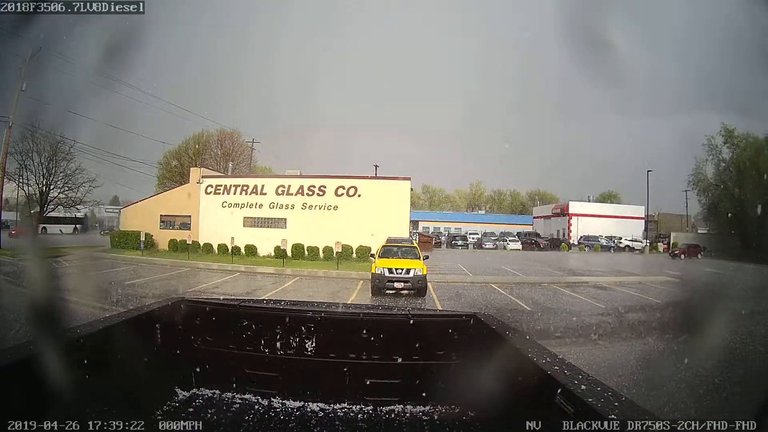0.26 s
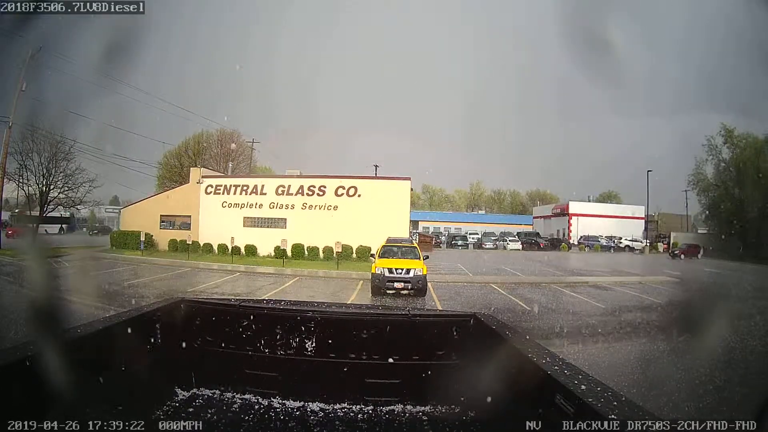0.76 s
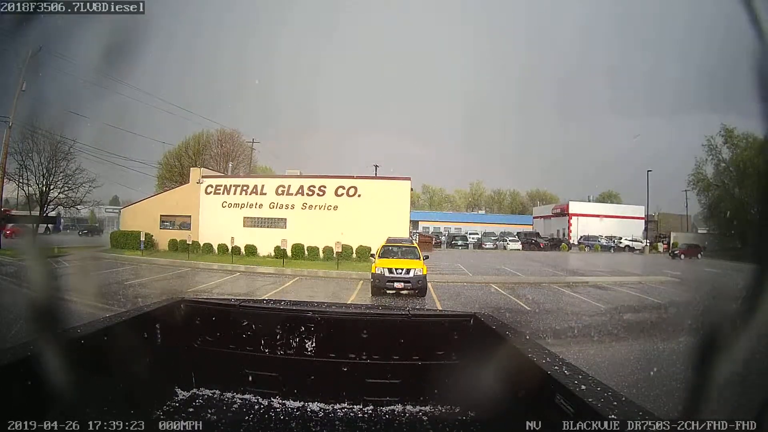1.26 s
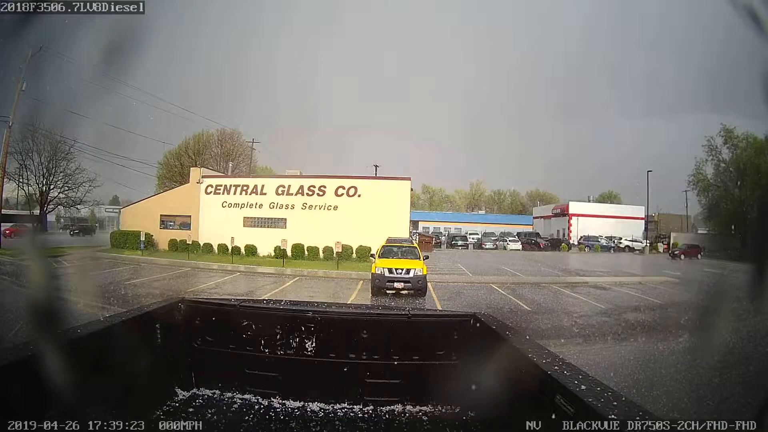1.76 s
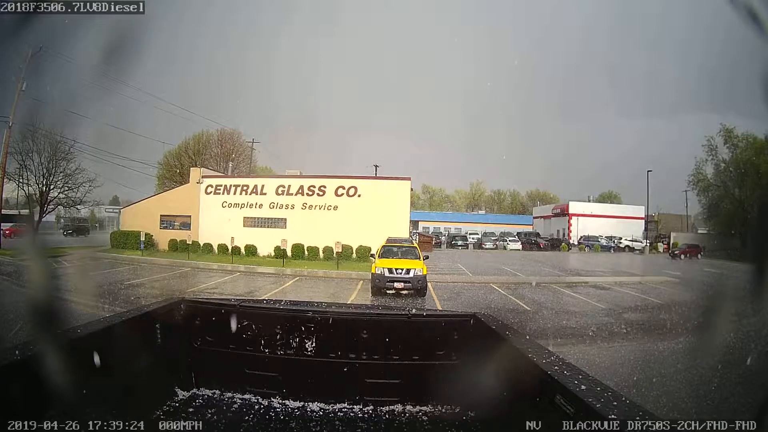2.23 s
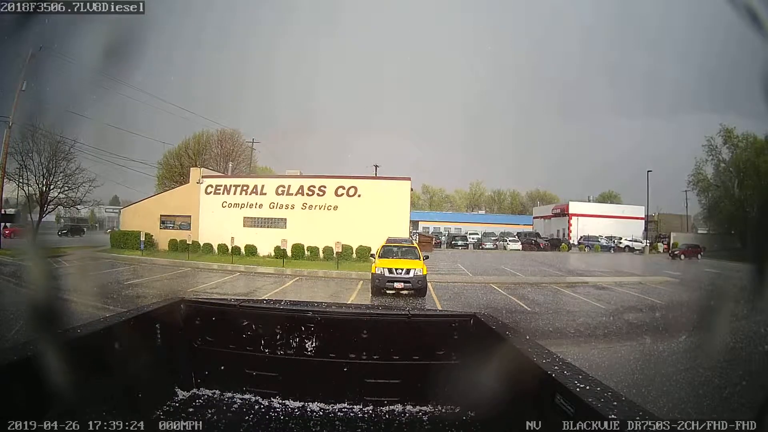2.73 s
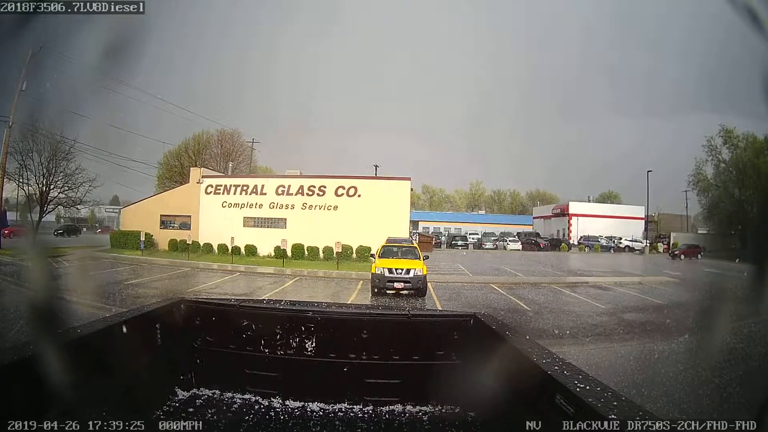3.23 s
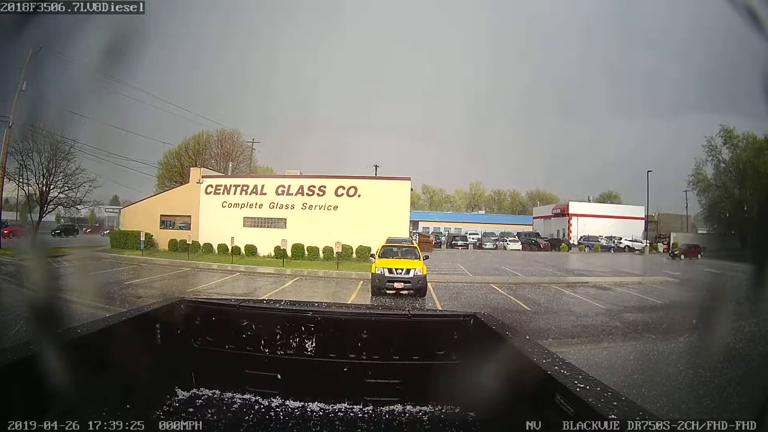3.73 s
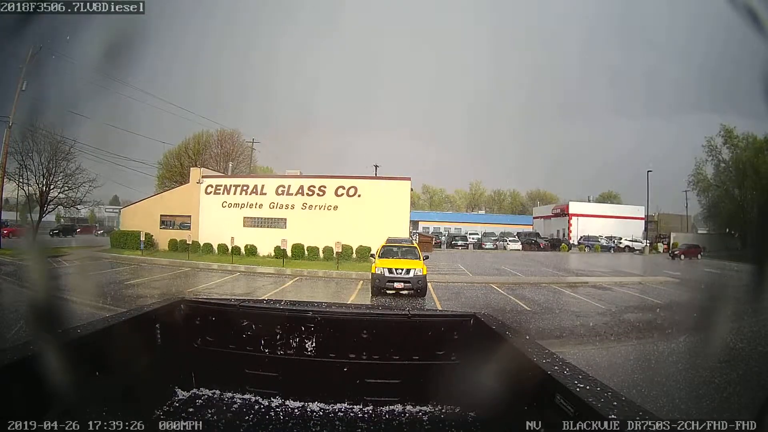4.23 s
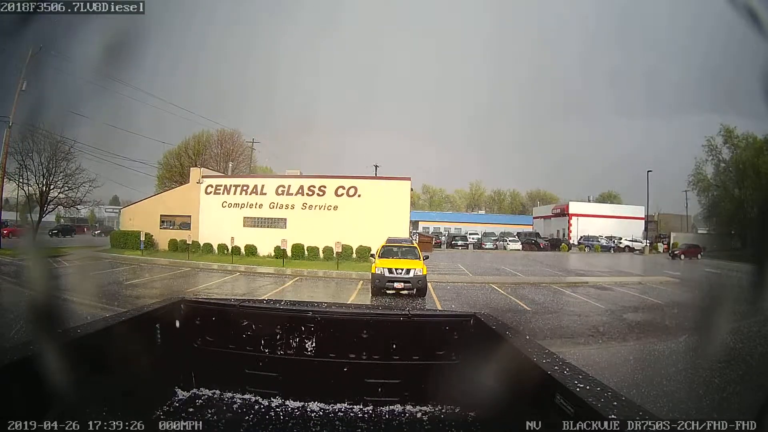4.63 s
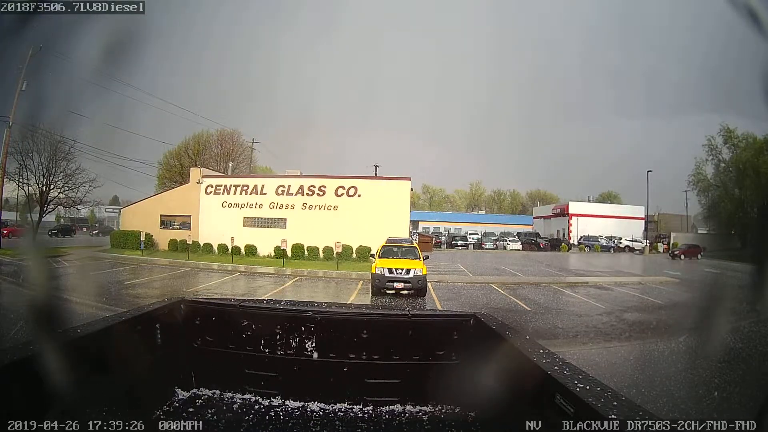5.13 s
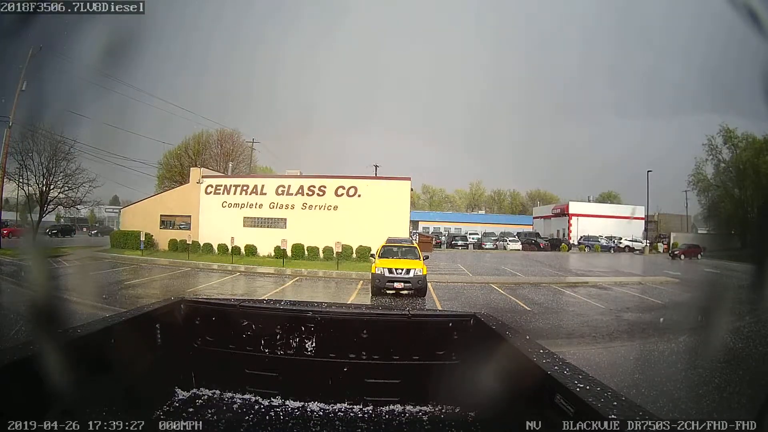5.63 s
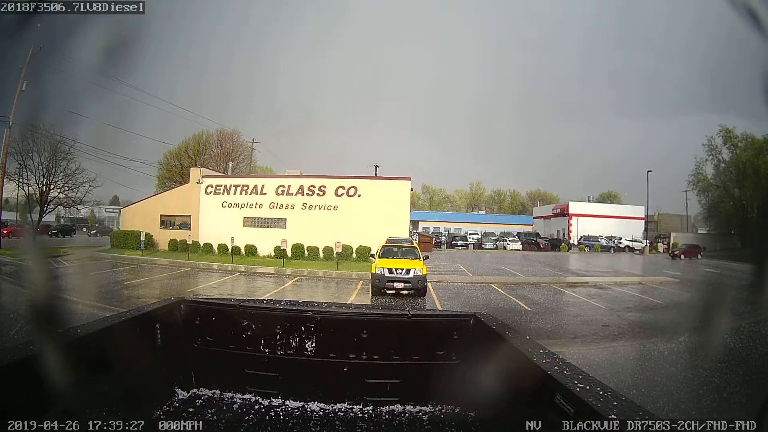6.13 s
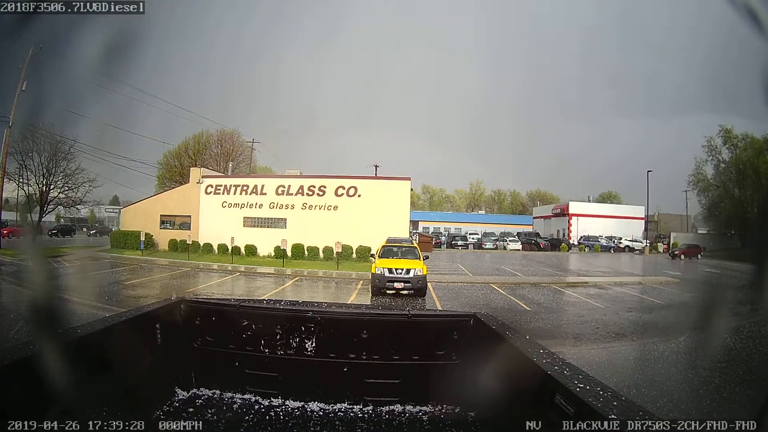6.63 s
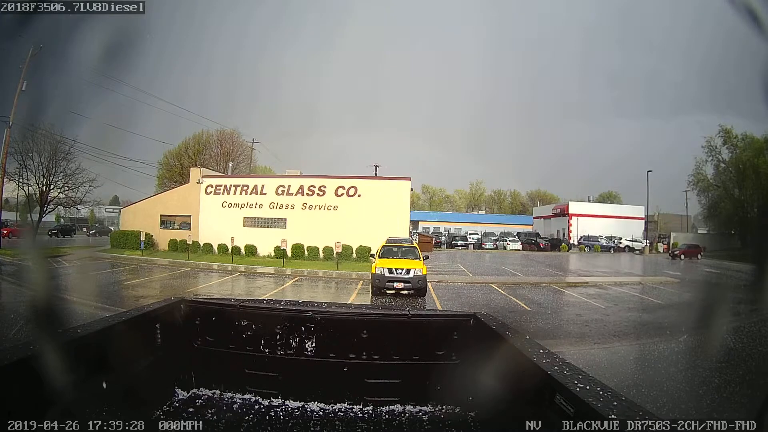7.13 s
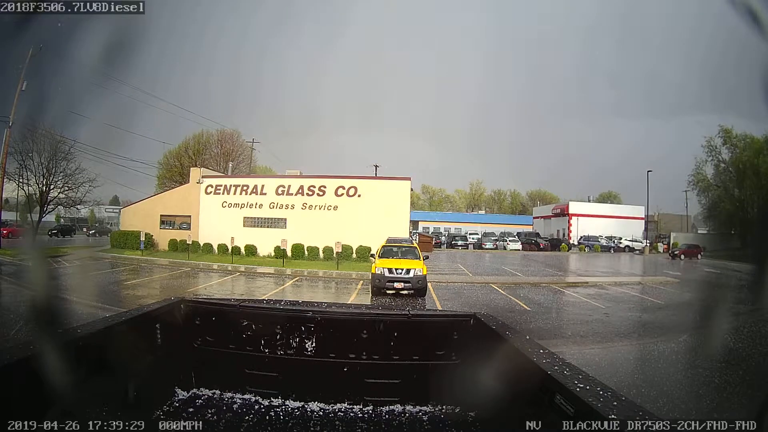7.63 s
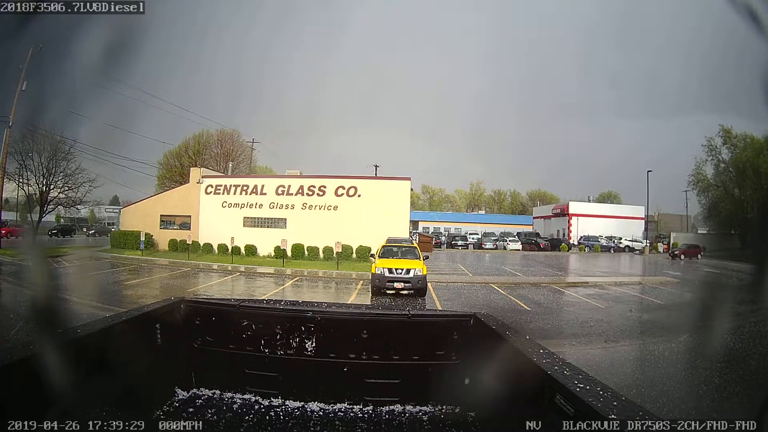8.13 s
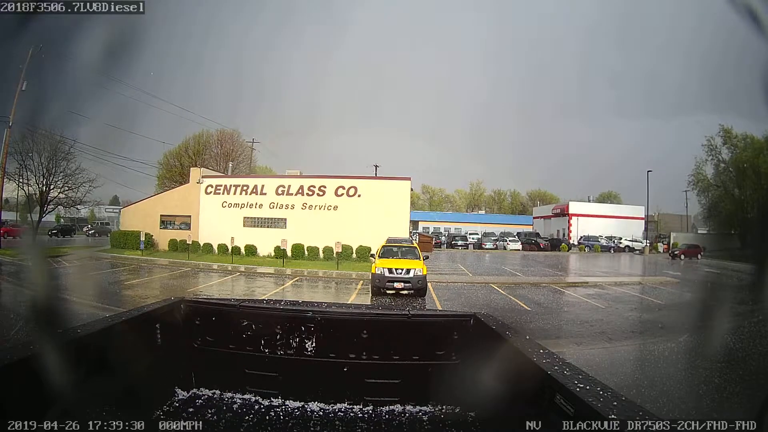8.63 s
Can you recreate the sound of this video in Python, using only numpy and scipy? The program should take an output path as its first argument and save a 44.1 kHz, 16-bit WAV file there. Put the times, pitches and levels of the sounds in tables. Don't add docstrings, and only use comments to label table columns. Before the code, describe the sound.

Hail hammers the roof and windows of a parked pickup in a dense clatter, then thins to scattered single knocks over low rumble.

```python
import sys
import numpy as np
from scipy import signal
from scipy.fft import rfft, irfft
from scipy.io import wavfile
from scipy.ndimage import uniform_filter1d

SR = 44100
rng = np.random.default_rng(int(sys.argv[2]) if len(sys.argv) > 2 else 0)


def transcribe(signal):
    frames = np.atleast_2d(signal).T
    limited = np.clip(frames, -1, 1)
    pcm = np.round(limited * 32767).astype(np.int16)
    wavfile.write(sys.argv[1], SR, pcm)


def amplitude_ratio(level_db):
    exponent = np.asarray(level_db, float) / 20
    return 10 ** exponent


N = 391602

# start_s, pellet_level_db, rumble_level_db
SHOWER = [
    (0.0, -18, -18.5),
    (0.29, -20.5, -25.5),
    (2.82, -27, -29),
    (3.51, -40.5, -24.5),
    (5.42, -50.5, -33.5),
    (6.01, -44.5, -41.5),
    (7.74, -44, -31),
    (8.88, -52.5, -43),
]

# freq_hz, level_db per Hz
RAIN_SPECTRUM = [(120, -17.5), (200, -0.5), (880, -6), (1310, -11), (1780, -19), (2270, -16), (3760, -27),
                 (5590, -27.5), (7700, -31.5), (10000, -75)]
# freq_hz, level_db per Hz
RUMBLE_SPECTRUM = [(15, -33), (25, -10.5), (48, -24), (81, -4), (129, 5.5), (300, -11), (390, -35.5),
                   (660, -120)]
IDLE_HZ, IDLE_DB = 40, -38.5

# start_s, peak_db, pitch_hz
THUMPS = [(0.82, -6.5, 154), (0.935, -11.5, 152.4), (1.164, -5.5, 108), (1.564, -15, 138),
          (1.944, -5.5, 154), (2.273, -4.5, 137), (3.221, -4.5, 206), (3.654, 1, 113.3), (4.323, -6.5, 171),
          (4.532, -6, 171), (5.078, -6, 194.3), (6.971, -0.5, 127), (7.683, -7, 143.7), (8.257, -9.5, 155),
          (8.299, -12, 85)]

# start_s, end_s, level_db
SPRAY = (4.075, 4.175, -20)
CHIP_HZ = (3800, 4530)
CHIP_DB, CHIP_T60_S, CHIP_GLIDE = -22.5, 0.023, .05

# start_s, peak_db, pitch_hz
KNOCKS = [
    (5.073, -10, 1305),
    (5.432, -1, 705),
    (5.955, 2, 962),
    (6.991, -3.5, 1140),
    (7.536, -4.5, 693),
    (7.635, -10, 700),
    (7.721, 1, 1120),
    (8.171, -6.5, 1397),
    (7.267, -7.5, 1900),
]
KNOCK_DB, KNOCK_T60_S, KNOCK_RISE_S = -1, 0.055, 0.00068

# freq_hz, level_db per Hz
CAB_COLOUR = [(110, -32), (180, -6), (368, -6), (751, -5), (881, -9), (1310, -4.5), (1720, -23.5),
              (2250, -12), (2680, -21), (3100, -16.5), (3790, -25.5), (5470, -27), (7160, -47.5),
              (8000, -43.5), (10400, -77)]
# freq_hz, t60_s
RING_TIME = [(200, 0.094), (530, 0.2), (1390, 0.16), (3680, 0.045), (7000, 0.054)]
COLOUR_HZ = [350, 1000, 2400, 5000]

# start_s, level_db, glass_db, crack_db
DOWNPOUR = [(0.003, -7, -7.5, -20), (0.083, -9.5, -9, -30), (0.126, -5, -9, -25), (0.149, -14, 4, -4.5),
            (0.197, -8.5, -8.5, -19), (0.265, -5, -6.5, -21), (0.283, -9, -6, -9.5), (0.318, -6, -18, -27),
            (0.415, -3, -7.5, -19), (0.453, -6.5, -20, -26.5), (0.478, -5.5, -3.5, -25.5),
            (0.56, -4, -9, -18), (0.611, -6, -4, -25), (0.64, -13.5, -1.5, -5), (0.734, -18, -6, -17),
            (0.793, -11.5, 4, -3), (0.831, -7, -6, -30), (0.883, -9.5, -3, -19), (0.91, -13, -6, -34),
            (0.954, -6, -6, -16.5), (1.012, -5.5, -11, -10.5), (1.043, -9, -4.5, -21),
            (1.116, -11.5, -6, -26), (1.166, -14, 0, -9), (1.198, -8, -6.5, -23), (1.291, -9.5, -9, -47),
            (1.364, -6, -19, -23), (1.403, -11, -5.5, -20), (1.431, -4.5, -6.5, -18.5),
            (1.496, -8, -2, -36)]
# start_s, level_db, glass_db, crack_db
STEADY = [(1.569, -8.5, -5.5, -26), (1.655, -10, -2, 0.5), (1.695, -12.5, -4.5, -11.5),
          (1.761, -7, -11.5, -25.5), (1.807, -3.5, -3.5, -27), (1.857, -8.5, -6.5, 2.5),
          (1.896, -4, -6.5, -21.5), (1.946, -5.5, -4, -20.5), (1.997, -10, -10, -25),
          (2.072, -9.5, -2.5, -19), (2.134, -7.5, -2.5, -9.5), (2.204, -10, -14.5, -16),
          (2.246, -4, -5.5, -9), (2.28, -5.5, -16, -42), (2.339, -8, -12, -26), (2.368, -9.5, -7, -17),
          (2.486, -7.5, -11, -19), (2.504, -8.5, -8, -24), (2.563, -11.5, -5.5, -26),
          (2.611, -8.5, -11, -25), (2.692, -5, -11, -32), (2.743, -6.5, -5, -14), (2.815, -7, -17, -35),
          (2.898, -7.5, -6, -24.5), (2.936, -9.5, -6.5, -27), (2.989, -6.5, -6, -6.5),
          (3.024, -8, -23, -30), (3.072, -5, -11.5, -26), (3.222, -7.5, -3.5, -24.5),
          (3.264, -11, -11, -22)]
# start_s, level_db, glass_db, crack_db
THINNING = [(3.344, -18, 2, -4.5), (3.389, -3.5, -7.5, -7.5), (3.446, -13.5, -7, -5), (3.494, -4, -28, -7),
            (3.593, -10, -5, -22), (3.643, -13.5, 1.5, -23), (3.668, -11.5, -7, -14),
            (3.731, -17.5, 0.5, -2), (3.767, -17, 1, 2), (3.787, -12.5, 2.5, -14), (3.913, -11, -1.5, -22),
            (3.972, -8, -8, -21.5), (4.071, -18, 5, -9.5), (4.106, -7.5, -6, -24), (4.15, -14, -3, -19),
            (4.227, -13.5, -2.5, -21), (4.246, -11, -3.5, -4), (4.287, -9.5, -15.5, -23),
            (4.323, -13.5, -18, -44), (4.376, -18.5, 1, -13), (4.397, -8, -9.5, -13.5),
            (4.461, -18, -2, -47), (4.537, -11, -8.5, -22.5), (4.552, -15, -2, -11.5), (4.608, -8.5, 1, 3),
            (4.766, -9.5, -9.5, -17), (4.804, -5.5, -21, -33), (4.916, -12.5, -4, -19),
            (4.934, -13, -11, -26), (4.985, -9.5, -3, -18)]
# start_s, level_db, glass_db, crack_db
EASING = [(5.074, -4, -5.5, -15.5), (5.12, -7.5, -13, -20), (5.16, -14.5, -2.5, -17.5),
          (5.186, -4, -15, -26.5), (5.24, -30, 6, -4), (5.261, -17.5, 5.5, -1.5), (5.303, -12, -5.5, -21),
          (5.328, -16.5, -4, -40), (5.397, -20, -4, -2), (5.415, -14, 0, -24), (5.43, -7, -12.5, -15),
          (5.479, -14.5, 7.5, -30.5), (5.507, -6, -8.5, -12.5), (5.537, -22, 9, 1), (5.566, -17, -10, -9),
          (5.62, -11, -15, -35), (5.667, -16.5, 1, -3.5), (5.776, -18, 5.5, -15), (5.818, -24.5, -11, -36),
          (5.836, -20, 5, -11), (5.953, -3, -19, -23.5), (6.036, -11.5, -4.5, -7.5), (6.086, -31, 8, 0),
          (6.218, -27, -41, -31), (6.237, -19, 1, -23), (6.3, -29.5, -44, -30), (6.323, -24, -4, -15),
          (6.335, -15.5, -4, -7.5), (6.357, -46, -7, -25), (6.402, -28.5, 6, -16)]
# start_s, level_db, body_db, glass_db, crack_db
LAST = [(6.461, -17, -12, -7.5, -31.5), (6.475, -15, 3, 0.5, -15.5), (6.523, -10.5, -9.5, -2, -17),
        (6.736, -18.5, -15.5, -1, -23.5), (6.781, -8, -13.5, -12, -31.5), (6.924, -41.5, 13.5, 6, -22),
        (6.99, -4, -11.5, -4, -17.5), (7.046, -34, 5, -32, -36), (7.266, -5.5, -12.5, 4, -13.5),
        (7.309, -20, 3, -31, -45), (7.363, -25.5, 2, 7.5, -2), (7.47, -23.5, -9, 0, 2),
        (7.536, -5.5, -8, -3.5, -17), (7.635, -25, 5, -45, -43), (7.721, -4, -7, 3, -9),
        (7.775, -25.5, -25, -5.5, -37), (7.904, -27.5, -10, 3.5, -3), (7.994, -11, -11, 8.5, -5.5),
        (8.171, -13, -10.5, -6, -53), (8.201, -16.5, -3.5, -8, -19.5), (8.456, -25, -16.5, -4, -8.5),
        (8.48, -9.5, -14.5, -17, -29), (8.614, -18.5, -9, -13, -36), (8.641, -13.5, -15, 4.5, -7.5)]
# start_s, level_db
TICKS = [(0.019, -15), (0.298, -11.5), (0.691, -16.5), (0.939, -5.5), (1.182, -9), (1.707, -6.5),
         (2.055, -12.5), (2.66, -14.5), (3.463, -11.5), (4.576, -13.5), (4.653, -14.5), (4.73, -24.5),
         (4.75, -20.5), (4.898, -18.5), (5.72, -30.5), (5.858, -42), (6.675, -36), (6.9, -35), (7.839, -35),
         (7.969, -35), (8.109, -40)]
# body_db, glass_db, crack_db
TICK_TINT_DB = [-7.5, -3.5, -9.5]
# start_s, level_db, glass_db, crack_db
PATTER_EARLY = [(0.057, -19, -8, -23), (0.096, -10, -6.5, -26), (0.23, -8, -16, -24), (0.246, -17, 6, -10),
                (0.362, -28.5, -12.5, -19), (0.393, -27, -12.5, -11), (0.402, -19.5, -4, -11.5),
                (0.444, -10.5, -2, -16), (0.547, -12.5, -14, -29), (0.601, -20, -10.5, -25),
                (0.655, -12.5, -6, -33), (0.666, -10.5, -7, -21), (0.706, -9.5, -7, -23),
                (0.747, -9, -5, -22), (0.803, -9, -13, -29), (0.816, -11.5, -4.5, -24),
                (0.849, -25, -12, -12), (0.928, -7, -14, -27), (0.986, -21, -4.0, -20),
                (1.066, -20, -9, -19), (1.086, -18, -14, -33), (1.154, -12.5, -15, -24),
                (1.246, -22, -20, -29), (1.254, -16.5, -6, -41.5), (1.333, -41, -4, -18),
                (1.355, -9, -7.0, -18.5), (1.377, -12.5, -0.5, -12.5), (1.488, -12.5, 0.5, -16),
                (1.527, -14.5, -12, -32), (1.582, -29, 3, -11), (1.595, -17, -7, -12),
                (1.612, -12, -5, -8.5), (1.641, -26.5, -5, -2.5), (1.681, -26.5, -8, -2.5),
                (1.744, -13, 0, -9.5), (1.786, -25, 3, -10), (1.834, -26, -13, 0),
                (1.872, -19.5, -6.5, -14), (1.93, -21, 2, 3)]
# start_s, level_db, glass_db, crack_db
PATTER_MIDDLE = [(1.973, -17, -6.5, -34), (2.013, -11.5, -5.5, -13.5), (2.027, -16, -3, -17),
                 (2.045, -14, -7, -25), (2.099, -14.5, -10, -19), (2.114, -10, -6, -35),
                 (2.187, -16.5, -8, -28), (2.236, -7.5, -2, -17), (2.301, -23, -7, -23),
                 (2.332, -15, -13, -14), (2.399, -12, -15, -35), (2.43, -59, -29, -12),
                 (2.459, -32.5, -21, -28), (2.473, -13, -24, -31), (2.539, -24, 2, -16),
                 (2.58, -9.5, -6, -19), (2.633, -11, -11, -34), (2.712, -14.5, -1, -9),
                 (2.733, -9, -6, -17), (2.756, -11.5, -4.5, -15), (2.797, -29.5, 2, -4.0),
                 (2.838, -16, -18, -10), (2.87, -25, -5, -28.5), (2.93, -19, -10, -13),
                 (3.045, -28, 3, -4.5), (3.107, -13.5, -6.5, -20), (3.138, -12.5, -7, -26),
                 (3.162, -15, -7, -33), (3.175, -14, -13, -28), (3.202, -22.5, -4, -4.5),
                 (3.323, -47, 4.0, -1), (3.381, -10.5, -9, -22), (3.424, -24.5, 12, -15),
                 (3.484, -22, 1, 1), (3.523, -11.5, -5, -21), (3.576, -42, -23, -2), (3.616, -23, -4, -9),
                 (3.63, -18.5, -10, -11), (3.698, -15.5, -5, -18)]
# start_s, level_db, glass_db, crack_db
PATTER_LATE = [(3.721, -12, -21, -29), (3.744, -6, -21, -20), (3.801, -27, 3, -8), (3.826, -39, -4, -9.0),
               (3.835, -16.5, -6, -19.0), (3.849, -30, 8, 0), (3.88, -49, 11, 16), (3.929, -12, -6, -17),
               (3.948, -18, -11, -25), (4.031, -47, -20, -17), (4.04, -46.5, -6, -8.5),
               (4.054, -39, -11, 4), (4.162, -11.5, -10, -25), (4.211, -23, -5, -27),
               (4.347, -11, -11.5, -39), (4.444, -8.5, -18, -33), (4.473, -15, 2, -25),
               (4.497, -12.5, -10.5, -19), (4.599, -16, -2, -2.5), (4.719, -36, 3, -26),
               (4.796, -11.5, -3.5, -31), (4.817, -13, -5, -16), (4.882, -25, -12, -14),
               (4.957, -22, -6, -16), (5.063, -42, 3, -11), (5.11, -18.5, -15.5, -27.5),
               (5.171, -16.5, -1.5, -14.5), (5.214, -24, 4, -8), (5.318, -30, -6, -1),
               (5.359, -42, -7, -13), (5.47, -27, -2, -14), (5.495, -18.5, -9.5, -7),
               (5.629, -19.5, -4, -14), (5.764, -27.5, -1, -9), (5.912, -47, -1, -20),
               (5.941, -41, -15, -27), (6.134, -44, -12, -11), (6.159, -41, -16, -18),
               (6.378, -28.5, -2, -12)]

PUNCH_HZ = (780.5, 1514)
PUNCH_DB, PUNCH_T60_S, PUNCH_LATE_S = -2, 0.009, .0008

# start_s, peak_db
OVERLOADS = [(0.001, -26), (0.416, -35.5), (0.611, -48), (1.365, -48.5), (1.5, -46), (5.185, -53),
             (0.956, -38), (1.6541, -43.5), (1.815, -41.5), (2.6918, -45), (2.746, -39.5), (3.3886, -38.5),
             (3.494, -36.5), (4.6094, -29.5), (5.5104, -37.5), (5.9583, -37.5), (6.9887, -43),
             (7.2649, -30.5), (7.5348, -39.5), (7.7195, -29.5), (7.993, -38)]
SPLATTER_HZ = [7600, 16000]
# low_hz, high_hz, share of moments missing
HOLES = [(7650, 8350, .35), (7880, 8150, .6)]


def rms_one(x):
    return x / np.sqrt(np.mean(x ** 2) + 1e-20)


def in_time(rows, s):
    at, *columns = np.transpose(rows)
    return [np.interp(s, at, c) for c in columns]


def at_hz(points, hz):
    freq_hz, value = np.transpose(points)
    return np.interp(np.log(hz), np.log(freq_hz), value)


def drift(rate_hz):
    knots = rng.standard_normal(400)
    return np.interp(np.arange(N) / SR * rate_hz, np.arange(len(knots)), knots)


def coloured(spectrum):
    hz = np.maximum(np.fft.rfftfreq(N, 1 / SR), 1)
    white = rfft(rng.standard_normal(N))
    return rms_one(irfft(white * amplitude_ratio(at_hz(spectrum, hz)), N))


def clicks(at_s, sizes):
    at = np.clip(at_s * SR, 0, N - 1).astype(int)
    return np.bincount(at, sizes, N) + 1e-18


def ring(pushes, hz, t60):
    r, w = amplitude_ratio(-60 / (t60 * SR)), 2 * np.pi * hz / SR
    return signal.lfilter([0, np.sin(w)], [1, -2 * r * np.cos(w), r * r], pushes)


def fading(power, t60, rise_s):
    r, q = amplitude_ratio(-120 / (t60 * SR)), np.exp(-1 / (max(rise_s, 1e-4) * SR))
    energy = signal.lfilter([1 - q], [1, -r - q, r * q], power)
    return np.sqrt(np.maximum(energy, 0))


def bandpass(x, order, edges_hz):
    return signal.sosfilt(signal.butter(order, edges_hz, "band", fs=SR, output="sos"), x)


def rain():
    return amplitude_ratio(-49 + 1.5 * drift(15)) * coloured(RAIN_SPECTRUM)


def body_rumble():
    level_db = in_time(SHOWER, np.arange(N) / SR)[1]
    return amplitude_ratio(level_db + 3.4 * drift(13)) * coloured(RUMBLE_SPECTRUM)


def idling_engine():
    cycles = np.cumsum(IDLE_HZ + 1.2 * drift(2.4)) / SR
    firing = amplitude_ratio(IDLE_DB + 1.4 * drift(2.5)) * np.sin(2 * np.pi * cycles)
    boom = rms_one(ring(rng.standard_normal(N), 63, 0.6))
    return firing + amplitude_ratio(IDLE_DB - 6.5) * boom


def roof_thumps():
    out, t = np.zeros(N), np.arange(int(.3 * SR)) / SR
    swell = (1 - np.exp(-t / 0.0079)) * amplitude_ratio(-60 * t / 0.14)
    for s, db, hz in THUMPS:
        tone = np.sin(2 * np.pi * hz * t) + .5 * np.sin(2 * np.pi * 0.66 * hz * t + 1)
        at = int(s * SR)
        out[at:at + len(t)] += (amplitude_ratio(db - 4.5) * swell * tone)[:N - at]
    return out


def chip_rattle(count):
    out, t = np.zeros(N), np.arange(int(.03 * SR)) / SR
    start_s, end_s, _ = SPRAY
    for along, size, pitch in rng.random((count, 3)):
        at = int((start_s + along * (end_s - start_s)) * SR)
        hz = np.interp(pitch, [0, 1], CHIP_HZ) * (1 + CHIP_GLIDE * t / CHIP_T60_S)
        fade = amplitude_ratio(CHIP_DB - 10 * size - 60 * t / CHIP_T60_S)
        out[at:at + len(t)] += fade * np.sin(2 * np.pi * np.cumsum(hz) / SR)
    return out


def panel_knocks():
    out, t = np.zeros(N), np.arange(int(.1 * SR)) / SR
    swell = (1 - np.exp(-t / KNOCK_RISE_S)) * amplitude_ratio(-60 * t / KNOCK_T60_S)
    for s, db, hz in KNOCKS:
        at = int(s * SR)
        out[at:at + len(t)] += amplitude_ratio(db + KNOCK_DB) * swell * np.sin(2 * np.pi * hz * t)
    return out


def pellets(count, spread_db, colour_db):
    s, size = rng.random((2, count))
    s = s * N / SR
    level_db = in_time(SHOWER, s)[0] + 2.5 - spread_db * np.log(size + .01)
    tint = colour_db * rng.standard_normal((count, 3)) + [0, 1.5, 3.0]
    return np.c_[s, level_db, tint]


def chip_spray(count):
    s, size = rng.random((2, count))
    start_s, end_s, db = SPRAY
    tint = np.ones((count, 1)) * [-14, 0, 20]
    return np.c_[start_s + s * (end_s - start_s), db - 8.0 * size, tint]


def with_body(rows):
    rows = np.array(rows, float)
    body_db = -10.5 - 0.22 * (rows[:, 2] + 9) - 0.29 * (rows[:, 1] + 8)
    return np.insert(rows, 2, body_db, axis=1)


def followers(stones, count, mean_s, down_db):
    chance = rng.random((len(stones), count, 5))
    rows = np.repeat(stones[:, None], count, axis=1)
    rows[..., 0] += .004 - mean_s * np.log(1 - .95 * chance[..., 0])
    rows[..., 1] += down_db * (.5 + chance[..., 1])
    rows[..., 2:] += 11.0 * (chance[..., 2:] - .5)
    rows[..., 4] = np.minimum(rows[..., 4], 10)
    return rows.reshape(-1, 5)


def all_hits():
    typical = [0, -8, -9, -9, -22]
    crowd = np.array(DOWNPOUR + STEADY + THINNING + PATTER_EARLY + PATTER_MIDDLE, float)
    dense = np.insert(crowd, 2, -9, axis=1) - typical
    ticks = np.c_[TICKS, np.tile(TICK_TINT_DB, (len(TICKS), 1))]
    lone = np.r_[with_body(EASING + PATTER_LATE), LAST, ticks] - typical
    small = np.r_[pellets(count=1500, spread_db=2.5, colour_db=4.0), chip_spray(count=30)]
    dense_trail = followers(dense, count=1, mean_s=.011, down_db=-5.5)
    lone_trail = followers(lone, count=1, mean_s=0.013, down_db=-15.5)
    hits = np.r_[small, dense, lone, dense_trail, lone_trail]
    tint = np.c_[hits[:, 2], 0 * hits[:, 2], hits[:, 3:]]

    def level_db(hz):
        place = np.interp(np.log(hz), np.log(COLOUR_HZ), np.arange(4))
        blend = np.maximum(1 - abs(place - np.arange(4)), 0)
        return hits[:, 1] + tint @ blend + at_hz(CAB_COLOUR, hz)

    near = np.clip((hits[:, 4] + 3.6) / 14, 0, 1)
    return hits[:, 0], level_db, near


def low_modes(s, level_db, count, late_cycles, loss_db):
    strength = rng.standard_normal((len(s), count))
    late = rng.exponential(1, (len(s), count))
    pitches = 180 * (2600 / 180) ** ((np.arange(count) + rng.random(count)) / count)
    out = np.zeros(N)
    for k, hz in enumerate(pitches):
        gain = amplitude_ratio(level_db(hz) + 10 * np.log10(hz / 1000) + loss_db)
        pushes = clicks(s + late[:, k] * late_cycles / hz, strength[:, k] * gain)
        out += ring(pushes, hz, 0.58 * at_hz(RING_TIME, hz))
    return out


def dent_punch(s, level_db, count):
    out, dealt = np.zeros(N), (s * SR).astype(int) % count
    for k, hz in enumerate(np.geomspace(*PUNCH_HZ, count)):
        for tone, t60, cut_db in ((hz, PUNCH_T60_S, 0), (2 * hz, PUNCH_T60_S / 2, 3.3)):
            push = clicks(s + PUNCH_LATE_S, -amplitude_ratio(level_db(tone) + PUNCH_DB - cut_db) * (dealt == k))
            out += ring(ring(push, tone, t60), tone, t60) * 40 / (t60 * SR)
    return out


def crack_and_field(s, level_db, crack_db, field_db, tail_db, uneven_db):
    edges = 180 * 2 ** np.arange(0, 5.6, .25)
    uneven = uneven_db * rng.standard_normal((len(s), len(edges)))
    sign = rng.choice([-1, 1], len(s))
    white, out = rng.standard_normal((2, N)), np.zeros(N)
    for k, (low, high) in enumerate(zip(edges, edges[1:])):
        hz = np.sqrt(low * high)
        gain, t60 = amplitude_ratio(level_db(hz) + uneven[:, k]), at_hz(RING_TIME, hz)
        power = clicks(s, (amplitude_ratio(field_db) * gain) ** 2)
        field = fading(power, t60, 0.0013 + 0.33 / hz) + amplitude_ratio(tail_db) * fading(power, t60, 0.0066)
        crack = clicks(s + PUNCH_LATE_S, amplitude_ratio(crack_db) * sign * gain)
        out += bandpass(crack + field * white[k % 2], 2, [low, high])
    return out


def hail():
    s, level_db, near = all_hits()
    modes = low_modes(s, lambda hz: level_db(hz) - 1.87 * near, count=60, late_cycles=0.817, loss_db=-18.5)
    punch = dent_punch(s, level_db, count=5)
    field = crack_and_field(s, level_db, crack_db=22 + 0.69 * near, field_db=2.3 - 6.1 * near,
                            tail_db=-20.0, uneven_db=3.5)
    return modes + punch + field


def scene():
    background = rain() + body_rumble() + idling_engine()
    return (background + roof_thumps() + chip_rattle(count=24) + panel_knocks() + hail())[None]


def headroom():
    s, db = np.transpose(OVERLOADS)
    return .83 + uniform_filter1d(clicks(s, 0 * db + 55.0), size=300)


def splatter():
    s, db = np.transpose(OVERLOADS)
    spit = fading(clicks(s, amplitude_ratio(2 * db)), 0.0029, 0) * rng.standard_normal(N)
    return bandpass(spit, 8, SPLATTER_HZ)


def flickering_top(x):
    chance = rng.random(N // 2822 + 1)[np.arange(N) // 2822]
    for low, high, share in HOLES:
        sos = signal.cheby2(8, 40, [low - 60, high + 60], "band", fs=SR, output="sos")
        missing = uniform_filter1d(1.0 * (chance < share), size=600)
        x = x - missing * signal.sosfiltfilt(sos, x)
    return x


def top_cut(x):
    return signal.sosfilt(signal.butter(12, 16000, fs=SR, output="sos"), x)


def record(dry):
    narrow = signal.sosfilt(signal.butter(4, 33, "high", fs=SR, output="sos"), dry)
    limit = headroom()
    narrow = np.clip(narrow, -limit, limit)
    narrow = signal.sosfilt(signal.cheby2(14, 55, 8500, fs=SR, output="sos"), narrow)
    mirror = narrow * np.cos(2 * np.pi * 16000 * np.arange(N) / SR)
    mirror = bandpass(mirror, 4, [8050, 8750])
    mix = flickering_top(narrow + amplitude_ratio(-10.5) * mirror) + splatter()
    return top_cut(np.clip(mix, -1, 1))


dry = scene()
out = record(dry)
transcribe(out)
```